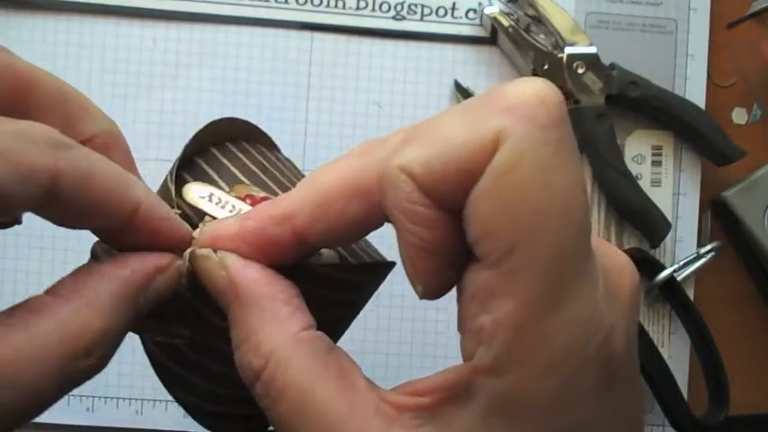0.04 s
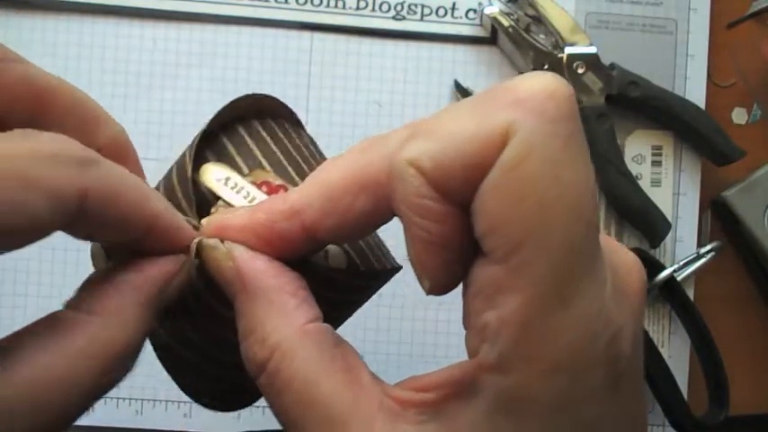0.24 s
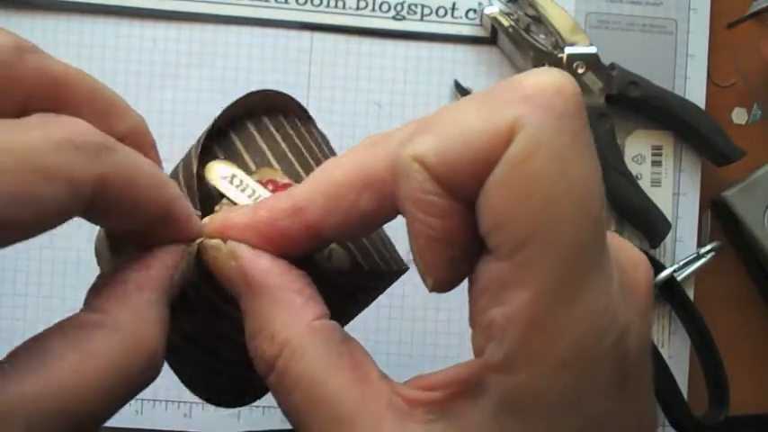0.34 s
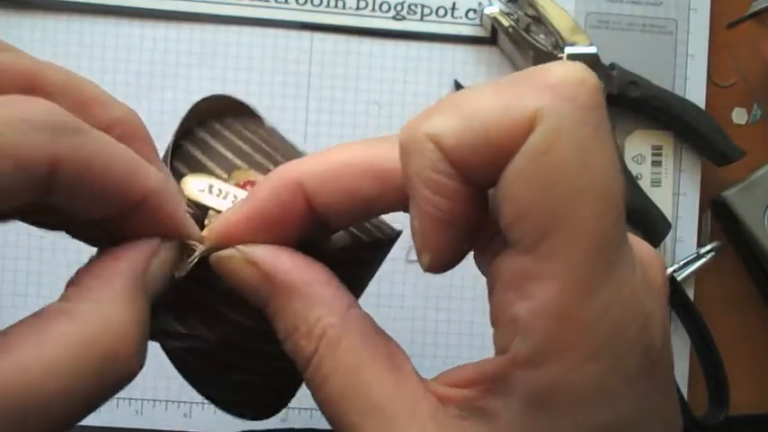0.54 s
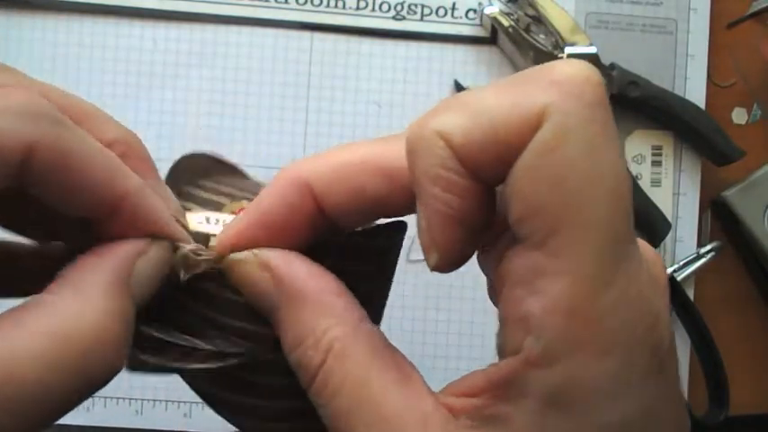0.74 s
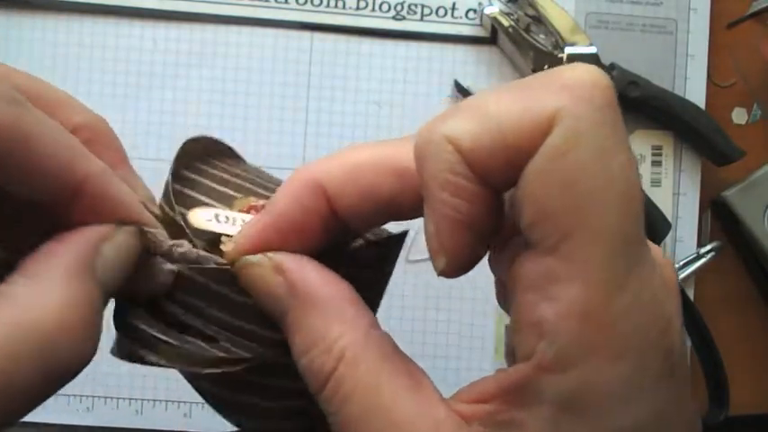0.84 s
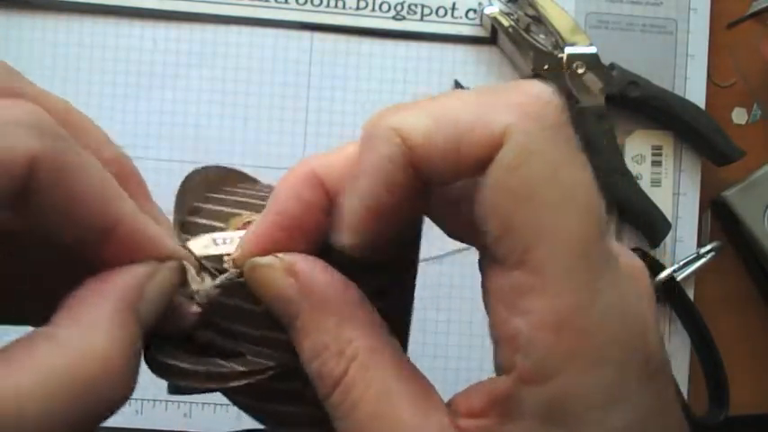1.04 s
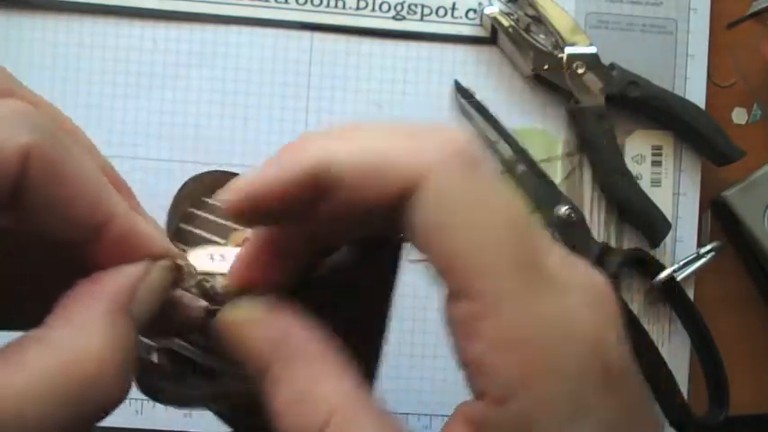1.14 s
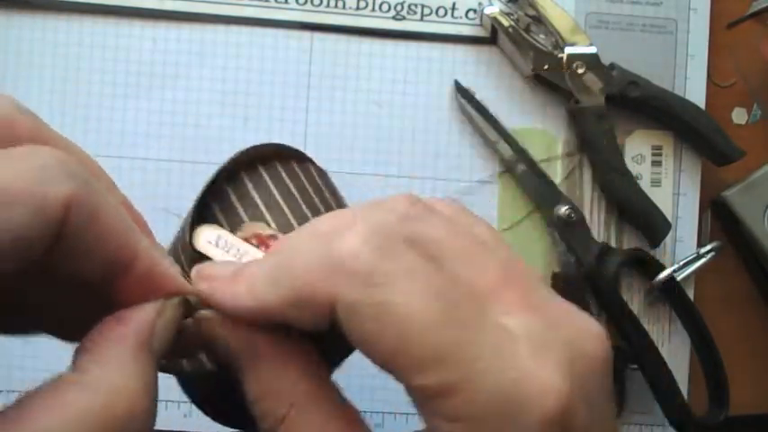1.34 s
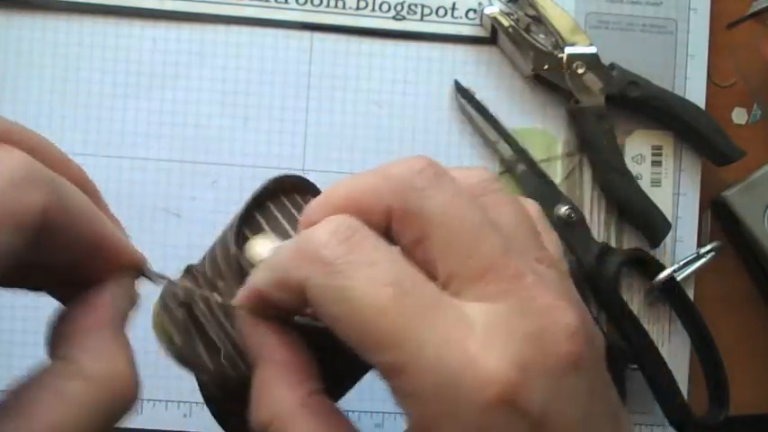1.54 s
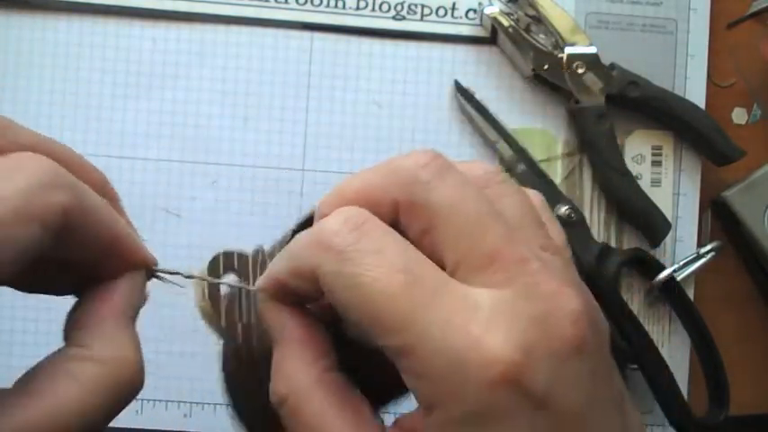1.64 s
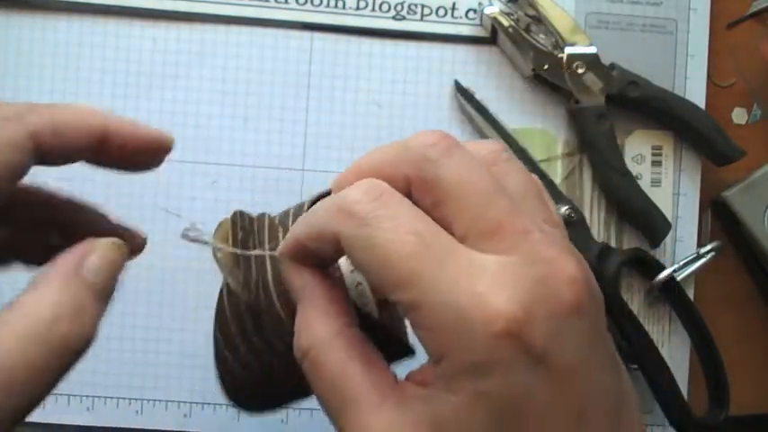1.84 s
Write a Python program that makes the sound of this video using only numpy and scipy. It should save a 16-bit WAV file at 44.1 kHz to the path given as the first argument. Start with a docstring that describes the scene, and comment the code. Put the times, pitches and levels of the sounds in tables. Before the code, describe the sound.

Twine rasps in short, grainy strokes as fingers tie it around a small card box. One sharp click comes early, then busier scrapes, little ticks and a soft tap, close to the microphone over steady hiss in a small room.

```python
"""Twine drags over a small card box in short grainy strokes as fingers tie it, close to the microphone.
Tiny slips of its fibres make the rasp; it sings when pulled tight and ticks when it catches.
The box gives one sharp click, takes a fingertip tap and nudges the craft table twice.
A small room adds a short echo, and a steady hiss and a low mains hum lie behind."""
import sys
import numpy as np
from scipy import signal
from scipy.io import wavfile
from scipy.ndimage import uniform_filter1d

SR = 44100
rng = np.random.default_rng(int(sys.argv[2]) if len(sys.argv) > 2 else 0)


def waveform_to_disk(signal):
    """Save audio, clipped to [-1, 1], as 16-bit WAV at the path in sys.argv[1]."""
    frames = np.transpose(np.atleast_2d(signal))
    scaled = np.clip(frames, -1, 1) * 32767
    samples = np.round(scaled).astype(np.int16)
    wavfile.write(sys.argv[1], SR, samples)


N = 83790

# Tone of rasping fibres: f/Hz, relative level/dB
RASP_TONE = [(150, -36), (700, -7.5), (2000, -8), (3000, -1), (4200, 1.5), (5300, 1.5), (6400, 2),
             (8500, -6.5), (10500, -18.5)]
# Tone of the hollow box: f/Hz, relative level/dB
BOX_TONE = [(80, -23), (300, -14.5), (400, -2), (520, 0.5), (600, -2.5), (740, 0), (1120, 4), (1550, -8),
            (2100, -5), (3200, -16.5), (6000, -25)]


def amp(db):
    """Turns decibels into a factor to multiply by."""
    return 10 ** (np.asarray(db) / 20)


def unit_power(x):
    """Scales a sound so that its squares average 1."""
    return x / np.sqrt(np.mean(x ** 2) + 1e-20)


def unit_energy(x):
    """Scales a sound so that its squares add up to 1."""
    return x / (np.linalg.norm(x) + 1e-20)


def add(mix, start_s, sound):
    """Mixes a sound in at a given time."""
    part = mix[max(round(start_s * SR), 0):][:len(sound)]
    part += sound[:len(part)]


def colour(x, tone):
    """Gives a sound the listed tone; white noise keeps its power."""
    hz, db = np.transpose(tone)
    f = abs(np.fft.fftfreq(4096, 1 / SR))
    log_gain = np.log(amp(np.interp(np.log(f + 1), np.log(hz), db)))
    response = np.exp(np.conj(signal.hilbert(log_gain)))  # rings after a hit, never before it
    taps = np.fft.ifft(response).real[:len(f) // 2]
    return signal.fftconvolve(x, unit_energy(taps))[:len(x)]


def burst(fade_s):
    """A puff of noise that falls by 60 dB in fade_s seconds."""
    t = np.arange(SR // 2) / SR
    return unit_energy(rng.choice([-1., 1.], len(t)) * np.exp(-np.log(1000) * t / fade_s))


def swell(start, rise, hold, fall):
    """The loudness of one movement: it rises, holds and falls."""
    t = np.arange(N) / SR - start
    return np.clip(t / rise, 0, 1) * np.clip(1 - (t - rise - hold) / fall, 0, 1)


def ringing(notes):
    """A struck card wall rings with several fading notes at once."""
    t = np.arange(SR // 2) / SR
    return sum(amp(db) * np.exp(-np.log(1000) * t / fade_s) * np.sin(2 * np.pi * hz * t) * (-1) ** k
               for k, (hz, db, fade_s) in enumerate(notes))


def cut_bass(x, cutoff_hz=210):
    """Light card gives off little bass."""
    return signal.lfilter(*signal.butter(2, cutoff_hz, "high", fs=SR), x)


def hiss_and_hum():
    """A steady hiss and the low hum of mains power."""
    # Tone of the hiss: f/Hz, relative level/dB
    hiss_tone = [(20, -20), (45, -11.5), (80, -3.5), (150, -0.5), (300, -2), (410, 0.5), (560, -1.5),
                 (750, -3), (1050, -3.5), (1600, -7.5), (3000, -9), (4500, -8), (6500, -10), (9000, -9),
                 (10500, -22.5)]
    # Notes of the hum: f/Hz, level/dB
    hum_notes = [(120.2, -62.5), (184, -74.5), (403, -71)]
    t = np.arange(N) / SR
    hum = sum(amp(db) * np.sqrt(2) * np.sin(2 * np.pi * (hz * t + rng.random())) for hz, db in hum_notes)
    return hum + amp(-55.5) * unit_power(colour(rng.standard_normal(N), hiss_tone))


def table_bumps():
    """The box nudges the table top, which thuds dully."""
    # Nudges: start/s, rise/s, hold/s, fall/s, level/dB
    nudges = [(0.227, .004, .01, .02, -65), (1.38, 0.012, .015, .025, -65)]
    # Tone of a thud: f/Hz, relative level/dB
    thud_tone = [(20, -25), (45, -3), (75, -1), (150, -4), (400, -43), (2000, -80)]
    loudness = sum(amp(db) * swell(*timing) for *timing, db in nudges)
    return loudness * unit_power(colour(rng.standard_normal(N), thud_tone))


def fingertip_tap(start_s=1.5288):
    """A fingertip knocks on the box, which rings soft and hollow."""
    # Notes of the tapped wall: f/Hz, level/dB, time to fade by 60 dB/s
    wall_notes = [(496, -45, 0.061), (840, -40.5, .05), (1070, -36, 0.036), (1670, -37.5, 0.022),
                  (1880, -35.5, 0.024), (2800, -30.5, 0.011), (3100, -33, 0.019)]
    out = np.zeros(N)
    add(out, start_s, ringing(wall_notes))
    return cut_bass(out)


def box_click(start_s=0.2266):
    """Two hard contacts in quick succession crackle briefly and set the box ringing."""
    # Contacts within the click: delay/s, relative level/dB
    contacts = [(0, -7), (.0008, -13)]
    # Tone of the crack: f/Hz, relative level/dB
    crack_tone = [(100, -24.5), (300, -1.5), (800, 6.5), (1600, -2), (2800, -2.5), (4000, 12.5),
                  (6000, 8.5), (8500, 6.5), (10500, -7)]
    # Notes of the box: f/Hz, relative level/dB, time to fade by 60 dB/s
    box_notes = [(277, -41.5, 0.05), (382, -39.5, 0.032), (508, -39, 0.074), (640, -37.5, 0.029),
                 (782, -26, 0.044), (1020, -33.5, 0.038), (1085, -39.5, 0.043), (1363, -40, 0.052),
                 (1857, -34, 0.033), (2150, -36, 0.037), (3220, -29, 0.047), (3780, -24.5, 0.02),
                 (4030, -23, 0.0064), (6100, -26, 0.017)]
    crack, ring = np.zeros(N), np.zeros(N)
    for delay, db in contacts:
        add(crack, start_s + delay, amp([db + 5.5]))
    add(crack, start_s, amp(-3.5) * burst(fade_s=0.013))
    add(ring, start_s, amp(1) * ringing(box_notes))
    return cut_bass(colour(crack, crack_tone) + ring)


def fibre_slips(slips_per_s=5000, spread_db=3.5):
    """Fibres make tiny slips of uneven size, each ringing briefly in the card."""
    size = amp(spread_db * np.minimum(rng.exponential(1, N), 4))
    slips = size * rng.choice([-1., 1.], N) * (rng.random(N) < slips_per_s / SR)
    card_ring = signal.fftconvolve(slips, burst(fade_s=0.029))[:N]
    return unit_power(slips + amp(2) * card_ring)


def twine_singing():
    """Under a pull, the twine or the card wall sings, and early on a long hollow rub hums low: the slips crowd
    round one pitch."""
    # Pulls, and first a long hollow rub: start/s, rise/s, hold/s, fall/s, f/Hz, filter width/Hz, level/dB
    pulls = [(0.077, 0.16, .25, 0.18, 438, 200, -57.5), (0.607, 0.042, 0.063, 0.089, 4120, 910, -52.5),
             (0.845, 0.0045, 0.033, .006, 6380, 600, -40), (0.838, 0.0095, .02, 0.036, 1070, 107, -41.5),
             (1.232, 0.017, 0.0063, 0.011, 1150, 320, -42), (1.236, 0.016, 0.031, .025, 4730, 900, -50)]
    out = np.zeros(N)
    for *timing, hz, width, db in pulls:
        peak = signal.iirpeak(hz, hz / width, SR)
        singing = signal.lfilter(*peak, signal.lfilter(*peak, fibre_slips()))
        out += amp(db) * swell(*timing) * unit_power(singing)
    return out


def twine_ticks(crumble=0.8):
    """Twine catches and slips free: a clean snap and a crumble of fibres knock the box."""
    # Catches: t/s, relative snap level/dB, relative box level/dB
    catches = [(0.3867, -48, -49), (0.5765, -48.5, -52), (0.7652, -41, -63), (0.8422, -29.5, -39),
               (0.8503, -35, -48), (0.8551, -31, -50), (0.8588, -32, -39.5), (0.8689, -35, -43),
               (0.89, -40, -53), (0.979, -48.5, -54), (1.1885, -35.5, -47), (1.3417, -50, -59),
               (1.3921, -37, -54), (1.399, -49, -39), (1.469, -52, -43), (1.5280, -39.5, -37.5),
               (1.5345, -58, -37.5), (1.5555, -48, -52), (1.5725, -46.5, -60), (1.6205, -39, -41.5),
               (1.807, -55, -58)]
    snap, knock = np.zeros(N), np.zeros(N)
    for start_s, snap_db, box_db in catches:
        tick = crumble * burst(fade_s=0.015)
        tick[0] += np.sqrt(1 - crumble ** 2)  # the clean snap
        add(snap, start_s, 10 * amp(snap_db) * tick)
        add(knock, start_s, 10 * amp(box_db) * tick)
    return colour(snap, RASP_TONE) + colour(knock, BOX_TONE)


def twine_strokes(judder_db=2, judder_s=0.0062):
    """Twine and fingers slide on card; one shaky grip drives the rasp, hollow box sound and fine fizz."""
    # Strokes: start/s, rise/s, hold/s, fall/s, rasp level/dB, box level/dB, fizz level/dB
    strokes = [ (0.023, 0.017, 0.014, 0.037, -52, -57, -64), (0.099, 0.012, 0.0081, 0.013, -53.5, -65, -81),
               (0.423, .09, 0.045, 0.049, -55, -55.5, -75), (0.592, 0.025, 0.018, 0.068, -50, -55, -66),
               (0.677, 0.028, 0.0066, .015, -45.5, -55, -64), (0.721, 0.014, 0.0075, .03, -52, -54.5, -74),
               (0.779, 0.048, 0.012, 0.011, -52, -50.5, -60),
               (0.837, .016, 0.022, 0.036, -40.5, -47.5, -55), (0.939, 0.013, 0.027, .03, -55, -60.5, -71),
               (0.974, 0.027, 0.015, .015, -43, -43.5, -51), (1.006, 0.014, 0.015, 0.015, -41.5, -45, -73),
               (1.032, .012, .004, 0.027, -48.5, -51.5, -75), (1.126, 0.006, 0.005, 0.011, -43, -47, -53),
               (1.136, 0.038, .02, 0.015, -43, -45.5, -50.5), (1.205, 0.012, 0.013, .02, -42, -58, -40),
               (1.231, 0.018, 0.0081, 0.018, -40, -42.5, -47), (1.26, 0.013, 0.035, 0.0098, -49, -56, -48),
               (1.33, 0.0085, 0.011, 0.018, -55, -56, -64), (1.371, 0.02, .012, 0.033, -45, -47, -54.5),
               (1.465, 0.0084, .005, 0.012, -57.5, -52.5, -68),
               (1.5, .002, 0.0087, 0.016, -47.5, -50, -47.5),
               (1.522, 0.0045, 0.01, 0.029, -51.5, -49.5, -53),
               (1.566, 0.035, .005, .02, -50.5, -58, -48.5),
               (1.604, 0.0079, 0.013, 0.0069, -43.5, -48.5, -46.5),
               (1.624, 0.0094, 0.011, 0.0053, -46.5, -49.5, -48.5)]
    # Tone of the fizz: f/Hz, relative level/dB
    fizz_tone = [(1000, -5.5), (4000, -10), (6500, 2.5), (8700, 5), (10500, -7.5)]
    wobble = unit_power(uniform_filter1d(rng.standard_normal(N), int(judder_s * SR)))
    judder = unit_power(amp(judder_db * wobble))
    powers = sum(np.outer(amp(levels_db), swell(start, rise, hold, fall)) ** 2
                 for start, rise, hold, fall, *levels_db in strokes)
    return sum(colour(fibre_slips() * judder * np.sqrt(power), tone)
               for power, tone in zip(powers, (RASP_TONE, BOX_TONE, fizz_tone)))


def scene():
    """The twine and box with the room's short echo, over the hiss and hum."""
    twine = twine_strokes() + twine_singing() + twine_ticks()
    handling = twine + box_click() + fingertip_tap() + table_bumps()
    echo = np.zeros(N)
    add(echo, start_s=0.004, sound=signal.fftconvolve(handling, burst(fade_s=0.15)))
    return (handling + amp(-13.5) * echo + hiss_and_hum())[None]


def record(dry):
    """The microphone loses one narrow band of treble, and the very highest treble is cut off."""
    notch_hz, width_hz, top_hz = 7620, 560, 10650
    notched = signal.lfilter(*signal.iirnotch(notch_hz, notch_hz / width_hz, SR), dry)
    low_pass = signal.firwin(127, top_hz, window=("kaiser", 8), fs=SR)
    return signal.oaconvolve(notched, low_pass[None], "same")


dry = scene()
out = record(dry)
waveform_to_disk(out)
```